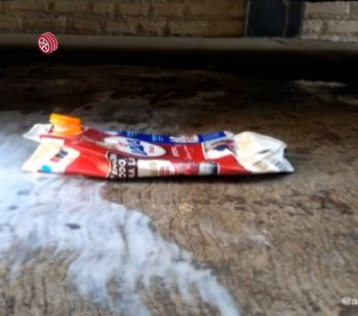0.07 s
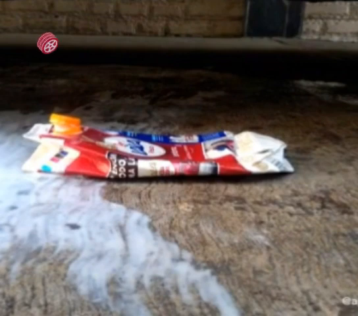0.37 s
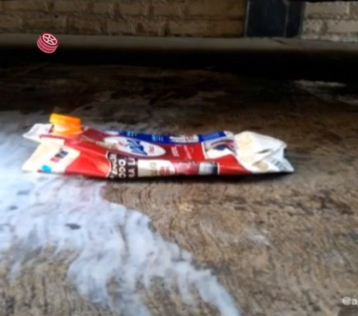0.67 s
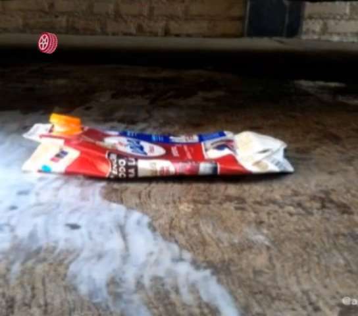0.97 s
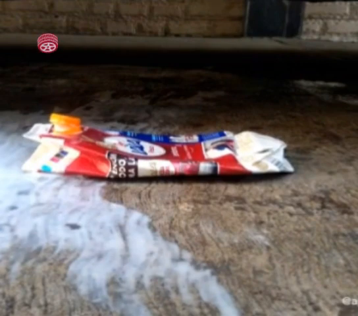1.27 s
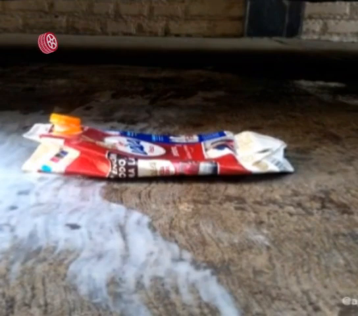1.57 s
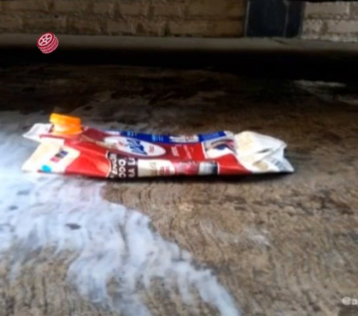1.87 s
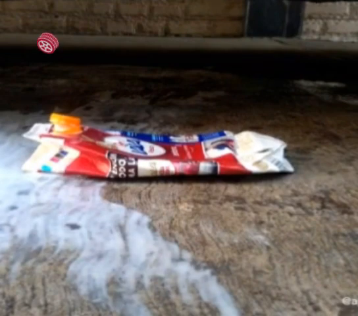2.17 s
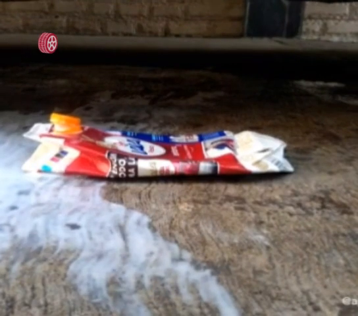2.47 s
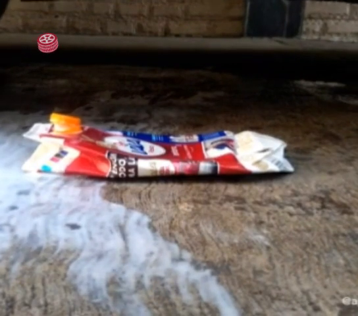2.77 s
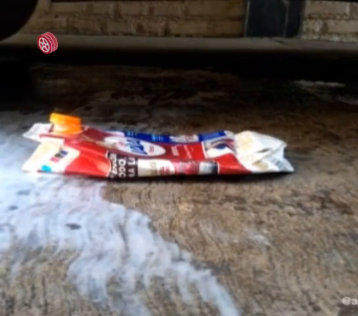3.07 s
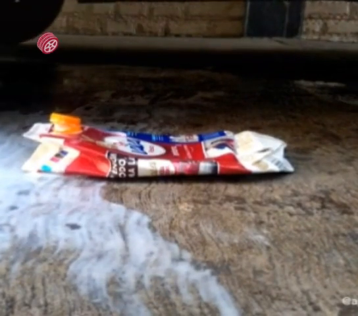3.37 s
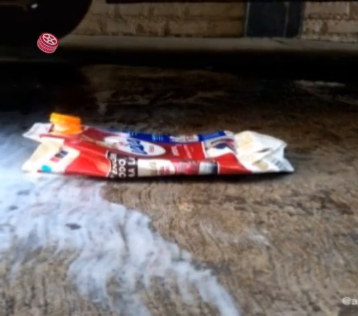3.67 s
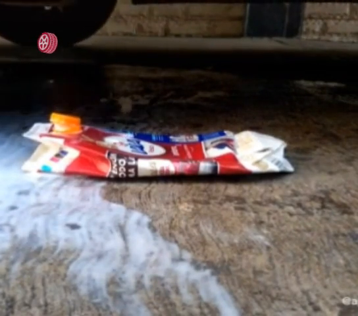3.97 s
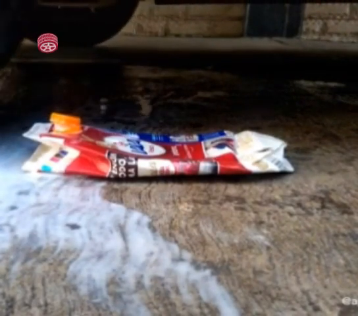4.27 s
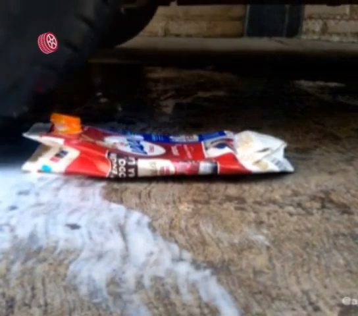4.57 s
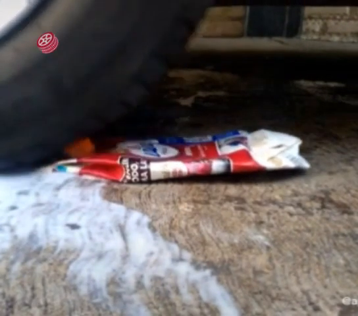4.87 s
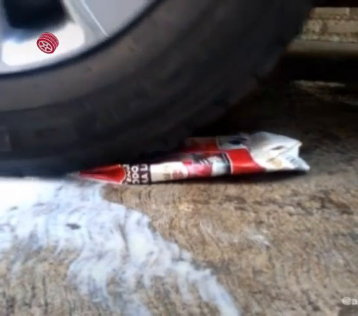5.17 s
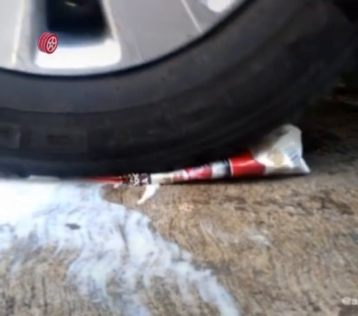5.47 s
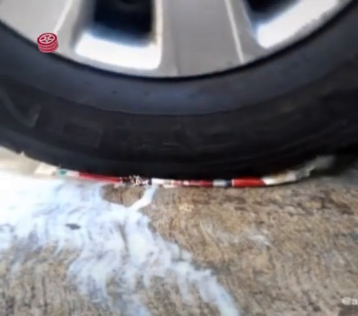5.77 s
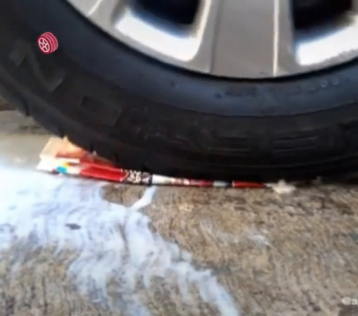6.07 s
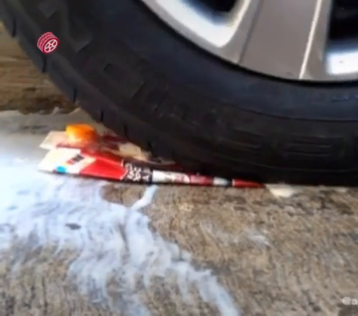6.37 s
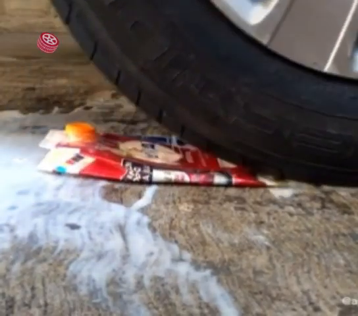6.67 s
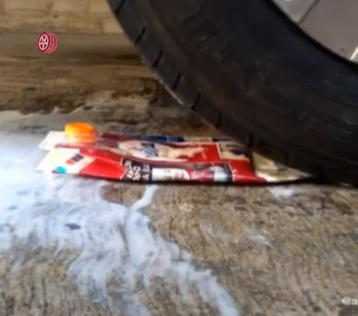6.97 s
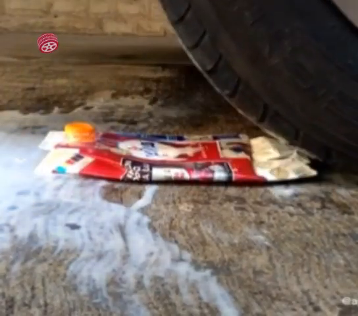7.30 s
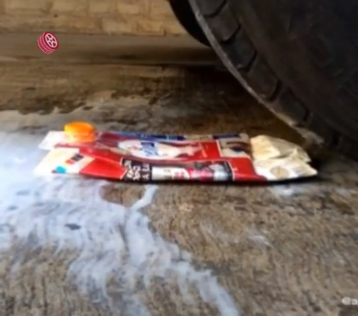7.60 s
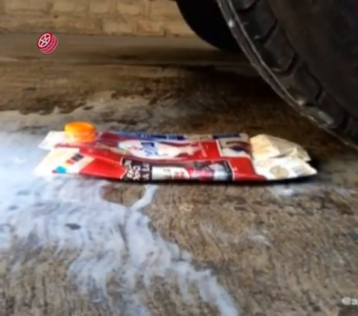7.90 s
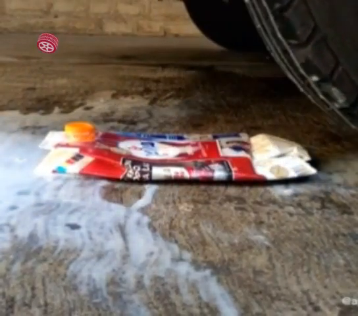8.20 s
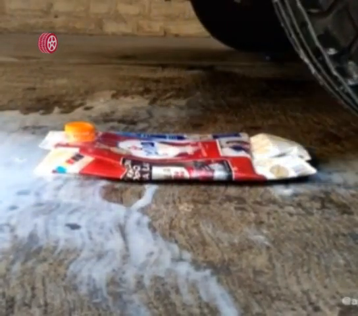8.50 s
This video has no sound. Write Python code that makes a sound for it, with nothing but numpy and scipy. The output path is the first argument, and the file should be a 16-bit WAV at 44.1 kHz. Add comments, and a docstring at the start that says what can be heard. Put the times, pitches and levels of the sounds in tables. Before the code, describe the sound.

A car creeps forward at idle, close to the microphone, its engine humming and hissing while the brakes give low groans. It shudders briefly, then a thin whine joins in. A drink carton crackles under the tyre on wet concrete and bursts with one loud, sharp pop and a short wet spurt. The engine drops very quiet after the pop, then swells back as the brakes groan again.

```python
"""A car creeps at idle over a drink carton on wet concrete, close to a small stereo camera.
The engine hums and hisses, and the dragging brakes groan. At 2.5 s the clutch bites and the body
shudders; then the alternator whines. From 4.85 s the carton creases under the tyre, and at 5.6 s it
bursts with one sharp pop. The pop drives the camera's gain control far down, and the engine takes
three seconds to swell back while the brakes groan again."""
import sys
import numpy as np
from scipy import signal
from scipy.fft import rfft, irfft, next_fast_len
from scipy.io import wavfile
from scipy.ndimage import uniform_filter1d, minimum_filter1d, map_coordinates

SR = 44100
rng = np.random.default_rng(int(sys.argv[2]) if len(sys.argv) > 2 else 0)


def wav_record(signal):
    """Record a signal, one row per channel, as 16-bit PCM in the file named by sys.argv[1]."""
    frames = np.transpose(np.atleast_2d(signal))
    bounded = np.clip(frames, -1, 1)
    # unit amplitude maps onto the largest positive 16-bit level
    quanta = np.round(bounded * 32767).astype(np.int16)
    wavfile.write(sys.argv[1], SR, quanta)


N = 381024
TIME_S = np.arange(N) / SR


def amp(db):
    """Decibels to gain."""
    return 10 ** (np.asarray(db) / 20)


def along(points, hz):
    """(Hz, value) points read on a log axis."""
    f, v = np.transpose(points)
    return np.interp(np.log(hz + 1), np.log(f + 1), v)


def curve(points):
    """(s, value) points read at every sample."""
    return np.interp(TIME_S, *np.transpose(points))


def swell(start, end, attack, release):
    """Envelope: reaches 1 at start, holds until end, falls to 0."""
    return np.clip(np.minimum(1 + (TIME_S - start) / attack, 1 - (TIME_S - end) / release), 0, 1)


def fade(t, t60):
    """Exponential decay by 60 dB in t60."""
    return np.exp(-np.log(1000) * t / t60)


def mode(t, hz, db, t60):
    """One struck resonance: a decaying sine."""
    return amp(db) * fade(t, t60) * np.sin(2 * np.pi * hz * t)


def angle(hz):
    """Running phase of a changing frequency."""
    return 2 * np.pi * np.cumsum(hz) / SR


def wobble(rate_hz):
    """Smooth random curve, rate_hz knots a second."""
    knots = rng.standard_normal(int(N * rate_hz / SR) + 4)
    steps = np.arange(8 * (len(knots) - 1)) / 8
    return np.interp(TIME_S * rate_hz, steps, map_coordinates(knots, [steps]))


def tone(phase, rough, rate_hz):
    """Line of rms about 1; strength and phase waver, a little differently at each microphone port."""
    shared = wobble(rate_hz) + 1j * wobble(rate_hz)
    own = np.array([wobble(rate_hz) + 1j * wobble(rate_hz) for _ in range(2)])
    waver = 1 + rough * (shared + 0.5 * own)
    return np.real(waver * np.exp(1j * phase)) * np.sqrt(2 / (1 + 2 * rough ** 2))


def narrow(hz, width_hz):
    """Noise in a sharp resonance, rms about 1."""
    return tone(angle(np.full(N, hz)), rough=11, rate_hz=width_hz)


def filtered(x, response):
    """x times a response of frequency."""
    size = next_fast_len(x.shape[-1] + SR // 4)
    return irfft(rfft(x, size) * response(np.fft.rfftfreq(size, 1 / SR)), size)[..., :x.shape[-1]]


def noise(spectrum, size):
    """Two unrelated coloured noises, rms 1."""
    x = filtered(rng.standard_normal((2, size)), lambda hz: amp(along(spectrum, hz)))
    return x / np.sqrt(np.mean(x ** 2) + 1e-20)


def pan(left_db):
    """Channel gains for a left-minus-right level."""
    return amp(np.array([[.5], [-.5]]) * left_db)


def add(track, at_s, sound):
    """Mix a sound in at at_s."""
    track[:, round(at_s * SR):][:, :sound.shape[-1]] += sound


# likeness of the two ports: (frequency [Hz], correlation [clipped to -1..1])
PORT_CORRELATION = [(60, 0.59), (130, -0.084), (300, 0.071), (550, 0.58), (1080, 1), (1450, -0.024),
                    (2080, -1.078), (2550, -0.1), (3150, 1), (4150, -1), (5200, 0.78), (6200, -0.68),
                    (7300, 0.27), (9000, -0.016)]


def rush(spectrum):
    """Steady noise, in and out of step at the two ports along the spectrum; common part rms 1."""
    def mid_side_gains(hz):
        turn = np.arccos(np.clip(along(PORT_CORRELATION, hz), -1, 1)) / 2
        return np.array([np.cos(turn), np.sin(turn)])
    band_limited = list(spectrum) + [(2 * spectrum[-1][0], -120)]
    mid, side = filtered(noise(band_limited, N), mid_side_gains)
    return np.array([mid + side, mid - side]) / np.std(mid)


# car's stereo position: (time [s], left minus right [dB])
CAR_PAN = [(0, 3), (5.5, 3.5), (6.7, 0), (7.5, 1.5), (8.6, 2)]


def passing(share):
    """Channel gains of a sound that follows a share of the car's pan."""
    return pan(share * curve(CAR_PAN))


# reverberation: (frequency [Hz], t60 [s])
CARPORT_DECAY = [(100, 0.41), (300, 0.29), (800, 0.37), (2500, 0.24), (10000, 0.16)]


def carport(x):
    """Floor, car body and wall reflect; the treble dies first."""
    hz, t, bins = signal.stft(rng.standard_normal((2, SR * 3 // 4)), SR, nperseg=256)
    tail = signal.istft(bins * fade(t, along(CARPORT_DECAY, hz)[:, None]), SR, nperseg=256)[1]
    tail = tail + 0.28 * tail[::-1]  # channel crossfeed
    tail = np.pad(tail / np.linalg.norm(tail[0]), ((0, 0), (SR // 400, 0)))
    return signal.fftconvolve(x, tail, axes=1)[:, :N]


def standing_waves(x, ripple_db=2.3, spacing_hz=28, drift_s=1.6, flatten_hz=3500):
    """The gap under the car colours its noise with narrow, slowly drifting peaks and dips."""
    hz, t, bins = signal.stft(x, SR, nperseg=4096)
    knots = rng.standard_normal((int(hz[-1] / spacing_hz) + 3, int(t[-1] / drift_s) + 3))
    ripple = map_coordinates(knots, np.meshgrid(hz / spacing_hz, t / drift_s, indexing="ij"))
    depth_db = ripple_db / np.sqrt(1 + (hz[:, None] / flatten_hz) ** 2)
    gain = amp(depth_db * ripple)
    gain /= np.sqrt(uniform_filter1d(gain ** 2, size=17, axis=0))
    return signal.istft(bins * gain, SR, nperseg=4096)[1][:, :N]


# moving off, rolling on: (time [s], load [0-1])
ENGINE_LOAD = [(1.2, 0.01), (2.25, 0.27), (2.54, 0.86), (2.9, 0.48), (3.6, 0.29), (5.5, 0.3), (6.8, 0.44),
               (8.1, 0.16)]
# noise spectra: (frequency [Hz], relative density [dB])
RUMBLE_SPECTRUM = [(25, -18.5), (60, -1.5), (95, -6.5), (125, 0), (200, 0.5), (250, -5.5), (350, -3),
                   (480, -13), (800, -31)]
FAN_SPECTRUM = [(280, -14), (470, 0), (570, 0), (740, 2.5), (1000, -5), (1250, -2.5), (1500, -7.5),
                (1900, -5), (2400, -18), (3500, -40.5)]
HISS_SPECTRUM = [(1500, -28), (2400, 6.5), (3100, 2.5), (3700, 1), (5100, -0.5), (6600, -1), (8000, -3),
                 (10500, -4), (14100, -10.5), (14500, -56.5)]
OPEN_FAN_SPECTRUM = [(750, -36), (1020, 4.5), (1400, -6), (1750, -0.5), (2150, -22)]  # upper midrange, once the wheel has gone by


def engine_bay(shaft):
    """Rumble, fan and hiss grow with load and throb at each firing."""
    load, throb = curve(ENGINE_LOAD), np.cos(shaft)
    rasp_db = 5.5 * np.exp(-((TIME_S - 2.545) / 0.018) ** 2)  # engine takes up the load
    rumble_db = -42.5 + 11 * load + 0.44 * rasp_db + 1.8 * throb + 0.68 * wobble(11)
    rumble = amp(rumble_db) * rush(RUMBLE_SPECTRUM) * passing(0.24)
    fan_db = -41.5 + 5 * load + 0.85 * throb + 1.04 * wobble(14)
    fan = amp(fan_db) * rush(FAN_SPECTRUM) * passing(0.44)
    air = rush(HISS_SPECTRUM) + amp(-12.5) * narrow(hz=3054, width_hz=220)
    hiss_db = -49.5 + 3 * load + rasp_db + 0.81 * throb + 0.94 * wobble(20)
    hiss = amp(hiss_db) * air * passing(0.21)
    open_fan = amp(-47.5) * swell(7.33, N / SR, 0.99, 0.99) * rush(OPEN_FAN_SPECTRUM)
    return standing_waves(rumble + fan + open_fan + hiss)


# (start [s], end [s], whistle [dB], sizzle [dB])
WHISTLE_SPELLS = [(0, 1.996, -69, -59.5), (6.7, 8.64, -47.5, -62.5)]


def whistles(fade_s=0.37, flutter_db=2):
    """Two narrow resonances in the engine noise: a soft whistle and a thin, fluttering sizzle."""
    whistle = narrow(hz=1220, width_hz=90)
    sizzle = narrow(hz=7420, width_hz=480) * amp(flutter_db * wobble(28))
    return sum(swell(start, end, fade_s, fade_s) * (amp(whistle_db) * whistle + amp(sizzle_db) * sizzle)
               for start, end, whistle_db, sizzle_db in WHISTLE_SPELLS)


# (order [x pump rate], approaching [dB], wheel past [dB])
PUMP_LINES = [(2, -48.5, -49.5), (7, -59, -54.5), (12, -59, -52)]


def pump(shaft, belt_ratio=3.885, pull_end_s=4.88, fade_s=0.58, pull_db=-6.5):
    """Belt-driven pump: faint hum, softer while the engine pulls; balance shifts as the wheel passes."""
    pulling = swell(2.9, pull_end_s, fade_s, fade_s)
    passed = swell(pull_end_s + fade_s, N / SR, fade_s, fade_s)
    hum = sum(amp(before + (after - before) * passed) * tone(k * belt_ratio * shaft, .4, rate_hz=12)
              for k, before, after in PUMP_LINES)
    return amp(pull_db * pulling) * hum


def alternator(shaft, fade_s=0.45):
    """Two belt-driven whines sing out on the approach; only the lower one sounds at idle."""
    singing = swell(3.32, 4.53, fade_s, fade_s)
    lower = tone(26 * shaft, rough=.6, rate_hz=38)
    upper = tone(39 * shaft, rough=.9, rate_hz=34)
    return amp(-58.5) * lower + singing * (amp(-46) * lower + amp(-48.5) * upper)


# idles, sags as the clutch bites, is caught twice, settles: (time [s], firing rate [Hz])
FIRING_RATE = [(2.08, 26.5), (2.33, 23.97), (2.62, 29.55), (2.87, 24.87), (3.06, 27.17), (3.47, 28.96),
               (3.68, 27.52), (4.3, 27.49), (5.5, 27.06), (6.1, 26.47), (6.6, 26.87), (7.7, 26.17),
               (8.05, 26.85), (8.3, 26.03)]


def firing_phase():
    """Phase of the four-cylinder engine, one cycle per firing."""
    return angle(curve(FIRING_RATE))


# exhaust boom: (time [s], level [dB])
BOOM_LEVEL = [(0.3, -33.5), (2.05, -33), (2.28, -44.5), (2.42, -36.5), (2.51, -27.5), (2.76, -30.5),
              (2.9, -33.5), (3.2, -31), (3.7, -34.5), (4.3, -31.5), (5.5, -34), (6, -39), (7.98, -38.5),
              (8.12, -35.5), (8.5, -40.5)]
# higher exhaust tones: (order [x firing rate], level re boom [dB])
EXHAUST_ORDERS = [(3, -9.5), (4, -19.5), (5, -24), (6, -21), (8, -17.5), (10, -18.5), (11, -22),
                  (13, -18.5)]


def engine(shaft):
    """The exhaust booms at twice the firing rate; higher orders, pump and alternator follow the shaft."""
    boom = tone(2 * shaft, rough=0.046, rate_hz=8.3)
    skew_rad = .5 * np.array([[1], [-1]])  # standing waves put the ports out of step
    orders = sum(amp(db) * tone(k * shaft + skew_rad + rng.uniform(0, 2 * np.pi), 0.24, rate_hz=4)
                 for k, db in EXHAUST_ORDERS)
    exhaust = amp(curve(BOOM_LEVEL)) * (boom + orders)
    return (exhaust + pump(shaft)) * passing(1) + alternator(shaft)


# car body: (frequency [Hz], relative level [dB], t60 [s])
BODY_MODES = [(79.4, -4, 0.15), (119, -1, .1), (205, -5, .05)]


def shudder(shaft, level_db=-32.5, scatter_db=4):
    """As the clutch bites, uneven firings shake the body, one dull thud each."""
    out, t = np.zeros((2, N)), np.arange(SR // 4) / SR
    firings = np.flatnonzero(np.diff(shaft // (2 * np.pi)))
    strength = swell(2.48, 2.6, attack=.05, release=.55)
    offsets_db = scatter_db * rng.standard_normal((len(firings), len(BODY_MODES)))
    for at, offsets in zip(firings, offsets_db):
        if strength[at] > 0:
            thud = sum(mode(t, hz, db + offset, t60) for (hz, db, t60), offset in zip(BODY_MODES, offsets))
            add(out, at / SR, strength[at] * thud)
    return amp(level_db) * out * passing(1)


# (start [s], end [s], first slip rate [Hz], last slip rate [Hz], final level of main partial [dB],
#  middle re main [dB], upper re main [dB])
BRAKE_DRAGS = [(0.406, 0.786, 56.2, 58.1, -42, -25, -30), (1.74, 2.314, 56.57, 59.8, -36.5, -25, -13.5),
               (3.061, 3.263, 62, 63.3, -32.5, -30, -27), (3.446, 3.63, 63.2, 61.9, -36, -13, -14),
               (6.342, 6.45, 49.76, 50.06, -36.5, -2, -12), (6.6, 6.751, 55.94, 51.4, -38, -1, 0),
               (6.899, 7.023, 53.63, 55, -33.5, -13, -3), (7.176, 7.32, 55.38, 53.9, -31, -2, -6.5),
               (7.435, 7.521, 54.4, 55.2, -33, -8, -2.5), (8.241, 8.6, 49.46, 48.8, -45.5, -20, -21)]
# upper partials: (order [x slip rate], relative level [dB])
GROAN_PARTIALS = [(5, -4), (6, 1.5)]


def brakes(growth_db_per_s=4, jitter=.008):
    """Pads stick and slip on the discs: a low, rough groan in swells."""
    glide, main_gain, middle_gain, upper_gain = [], 0, 0, 0
    for start, end, first_hz, last_hz, db, middle_db, upper_db in BRAKE_DRAGS:
        level_db = db + growth_db_per_s * np.minimum(TIME_S - end, 0)
        gain = amp(level_db) * swell(start, end, attack=0.18, release=0.075)
        main_gain += gain
        middle_gain += amp(middle_db) * gain
        upper_gain += amp(upper_db) * gain
        glide += [(start, first_hz), (end, last_hz)]
    slip = angle(curve(glide) * (1 + jitter * wobble(22)))
    partial = lambda k: tone(k * slip, rough=.26, rate_hz=30)
    low, main, middle = partial(2), partial(3), partial(4)
    upper = sum(amp(db) * partial(k) for k, db in GROAN_PARTIALS)
    return (main_gain * (main + amp(-9.5) * low) + middle_gain * middle + upper_gain * upper) * passing(1)


def cap(at_s=4.9558):
    """The tyre pinches the plastic cap: a short, bright click."""
    out, t = np.zeros((2, N)), np.arange(SR // 10) / SR
    add(out, at_s, mode(t, hz=5400, db=-29.5, t60=0.02))
    return out


# carton's hollow body: (frequency [Hz], relative level [dB], t60 [s])
CARTON_MODES = [(597, -11, 0.093), (855, -13.5, .03), (1210, -15, 0.014)]


def knock(t, hz, cycles, ring_db):
    """A carton wall flips, peaking after the given cycles, and rings the hollow body."""
    u = t * hz / cycles
    flip = u ** 2 * np.exp(2 - 2 * u) * np.sin(2 * np.pi * hz * t)
    body = sum(mode(t, f, db + rng.normal(0, 1.5), t60) for f, db, t60 in CARTON_MODES)
    return flip + amp(ring_db) * body


# (time [s], knock [dB], knock pitch [Hz], ring re knock [dB], crack [dB], crack centre [Hz])
CREASE_SNAPS = [(4.8513, -22, 1139, 0, -34, 1800), (4.8534, -13, 920, 0.5, -29, 1784),
                (4.9319, -18.5, 905, -4, -24.5, 6000), (4.9353, -35, 1100, -8, -23.5, 2750),
                (4.9553, -24, 1300, 4, -24.5, 6200), (4.9955, -20, 1050, -1, -24, 1800),
                (5.469, -14, 740, -2.5, -35, 2000), (5.85, -22, 1194, -6, -25, 7920),
                (5.9215, -36, 1000, -6, -24, 6500), (5.9590, -20, 690, -6, -26, 6000)]
# (frequency [x crack centre], relative density [dB])
CRACK_SPECTRUM = [(.2, -22), (.75, -6.5), (1, -1), (1.4, -6.5), (2.1, -15.5), (4.5, -56)]


def creases():
    """Each fold snaps with a hollow knock and a bright crack."""
    out, t = np.zeros((2, N)), np.arange(SR // 4) / SR
    envelope = (fade(t, 0.011) + 0.06 * fade(t, 0.06)) * (1 - np.exp(-t / 0.00046))
    for at_s, knock_db, hz, ring_db, crack_db, crack_hz in CREASE_SNAPS:
        colour = [(k * crack_hz, db) for k, db in CRACK_SPECTRUM]
        crack = noise(colour, len(t)) * envelope
        hollow = knock(t, hz, cycles=.8, ring_db=ring_db)
        add(out, at_s, amp(knock_db) * hollow + amp(crack_db) * crack)
    return out


# (frequency [Hz], level re pop [dB], t60 [s])
UNDERSIDE_MODES = [(122, -43, .42), (160, -38.5, .16), (243, -41.5, 0.5), (550, -48, 0.47),
                   (690, -47, 0.43)]


def underside():
    """The hollow between floor and car rings on after the pop."""
    t = np.arange(SR) / SR
    return sum(mode(t, hz, db, t60) for hz, db, t60 in UNDERSIDE_MODES)


# seam ripping and spurting: (frequency [Hz], relative density [dB])
RIP_SPECTRUM = [(1000, -6), (2500, 0), (4000, -12), (14000, -15), (17000, -35)]
SPURT_SPECTRUM = [(150, -10.5), (500, 7.5), (1200, -4), (2500, -7), (5000, -17), (11000, -17.5),
                  (15500, -28.5)]


def burst(at_s=5.6222, pop_db=26.5, width_s=.00035, snap_s=.00007):
    """The seam rips: one push and pull of air with a steep snap between, a short ring, a wet spurt."""
    out, t = np.zeros((2, N)), np.arange(SR // 4) / SR
    since_s = TIME_S - at_s - width_s
    push_pull = lambda u: -u * np.exp((1 - u ** 2) / 2)
    blast = push_pull(since_s / width_s) + amp(-16.5) * push_pull(since_s / snap_s)
    blast = filtered(blast, lambda hz: hz / np.hypot(hz, 120))  # small source, little bass
    ring = amp(-22) * knock(t, hz=690, cycles=1.5, ring_db=-4)
    rip = amp(-15.5) * noise(RIP_SPECTRUM, len(t)) * fade(t, .005)
    spurt = amp(-26) * noise(SPURT_SPECTRUM, len(t)) * fade(t, 0.074) * (1 - np.exp(-t / 0.0013))
    add(out, at_s, ring + rip + spurt)
    add(out, at_s, underside())
    return amp(pop_db) * (out + blast) * pan(4.2)


def scene():
    """The car, dipping briefly after the first run of cracks, and the carton with its echo."""
    shaft = firing_phase()
    car = engine(shaft) + engine_bay(shaft) + whistles() + brakes() + shudder(shaft)
    dip_db = -4 * swell(5.09, 5.09, attack=0.21, release=0.36)
    carton = creases() + cap() + burst()
    return car * amp(dip_db) + carton + amp(-21.5) * carport(carton)


def gain_control(x, ceiling_db, hold_s, release_db_per_s):
    """Gain drops at once when pressure passes the ceiling, holds, then climbs back."""
    pressure = np.abs(uniform_filter1d(x.mean(axis=0), size=SR // 2500))
    over_db = np.maximum(20 * np.log10(pressure + 1e-9) - ceiling_db, 0)
    half_hold = round(hold_s * SR / 2)
    held_db = -minimum_filter1d(-over_db, size=2 * half_hold + 1, origin=half_hold)
    climb_db = release_db_per_s * TIME_S
    cut_db = np.maximum.accumulate(held_db + climb_db) - climb_db
    gain_db = minimum_filter1d(-cut_db, size=SR // 800)  # look-ahead
    return x * amp(uniform_filter1d(gain_db, size=SR // 2000))


def record(dry):
    """Camera: gain control, clipping at full scale, band limit."""
    top_hz, rolloff_hz = 15650, 700
    held = gain_control(dry, ceiling_db=0.14, hold_s=0.35, release_db_per_s=10.5)
    return filtered(np.clip(held, -1, 1), lambda hz: np.clip((top_hz - hz) / rolloff_hz, 0, 1))


dry = scene()
out = record(dry)
wav_record(out)
```